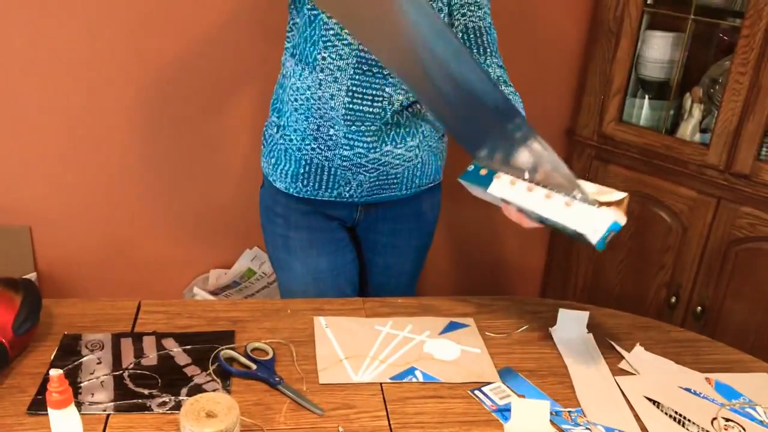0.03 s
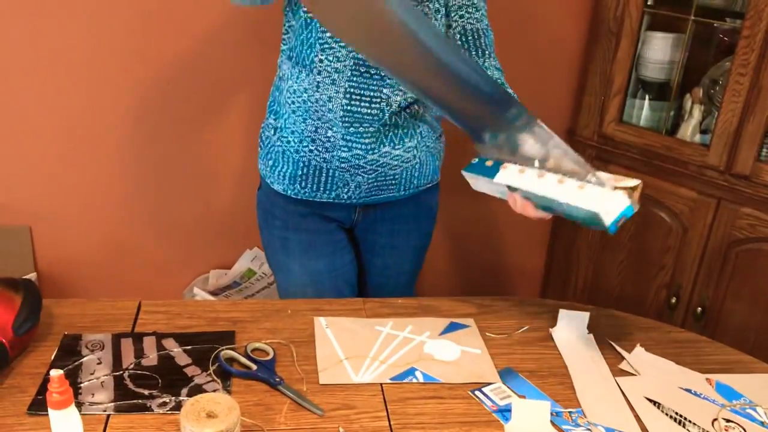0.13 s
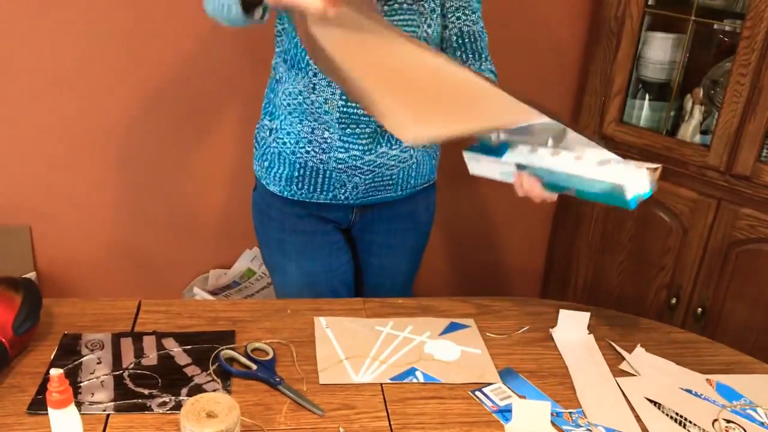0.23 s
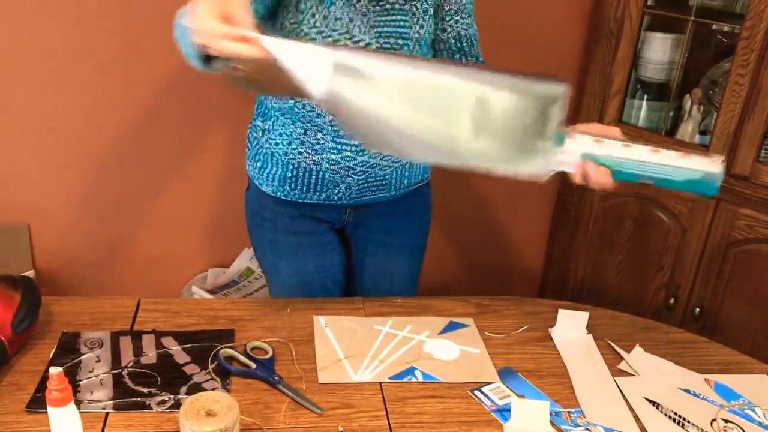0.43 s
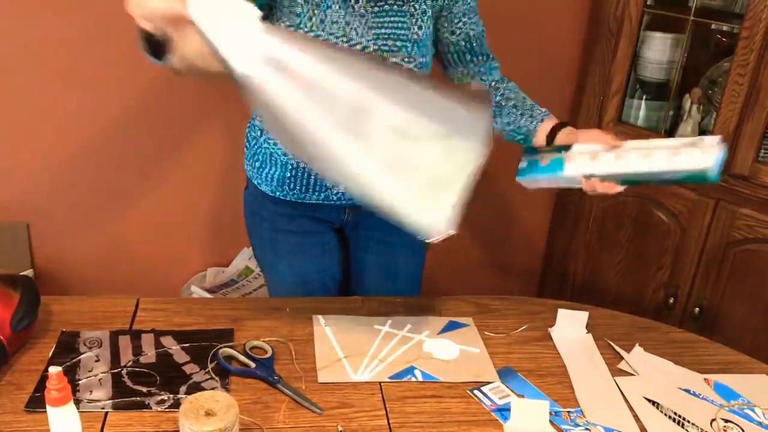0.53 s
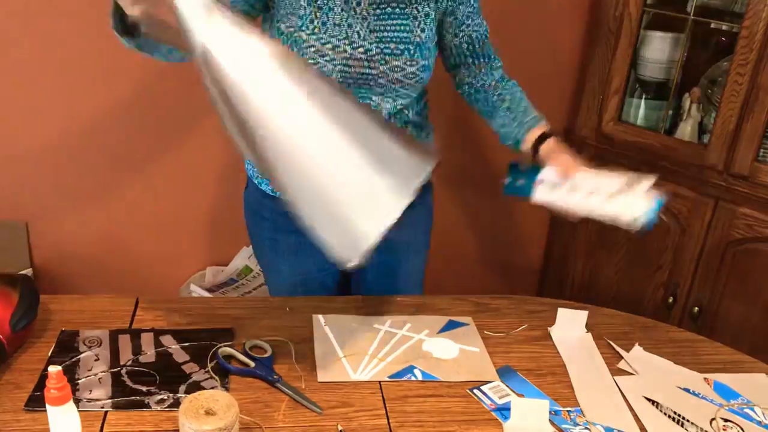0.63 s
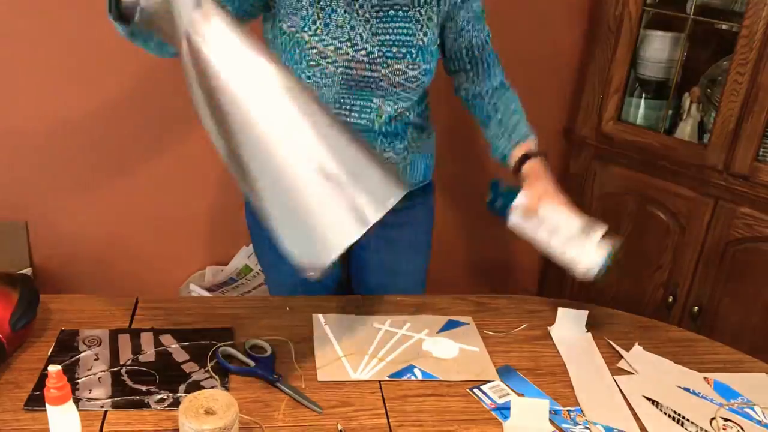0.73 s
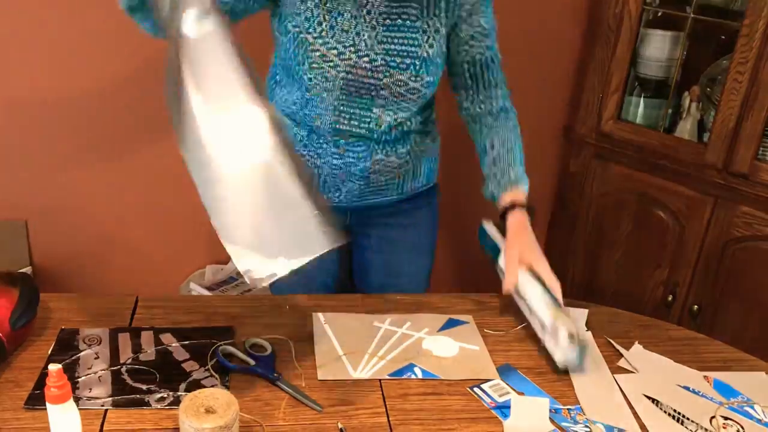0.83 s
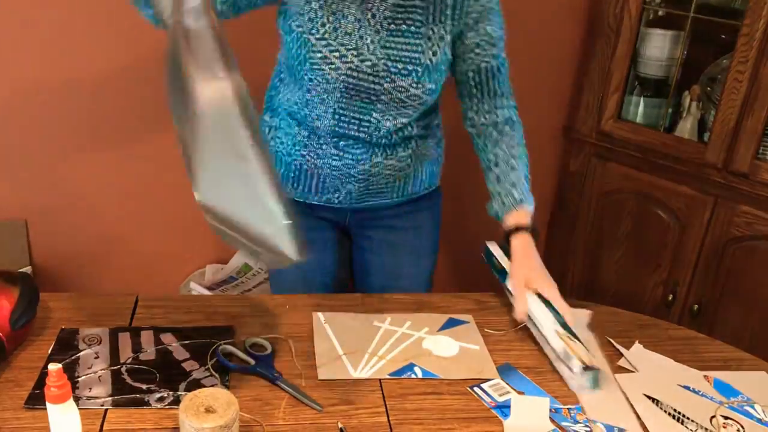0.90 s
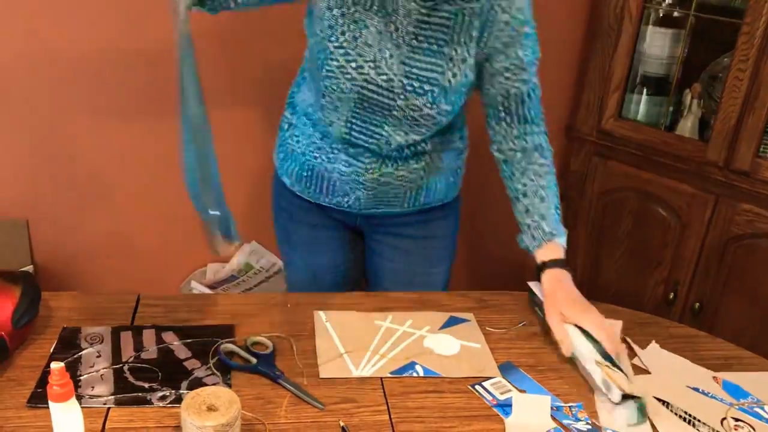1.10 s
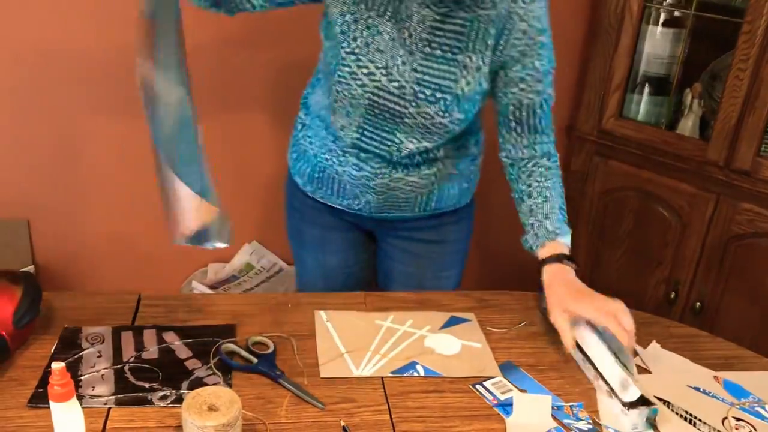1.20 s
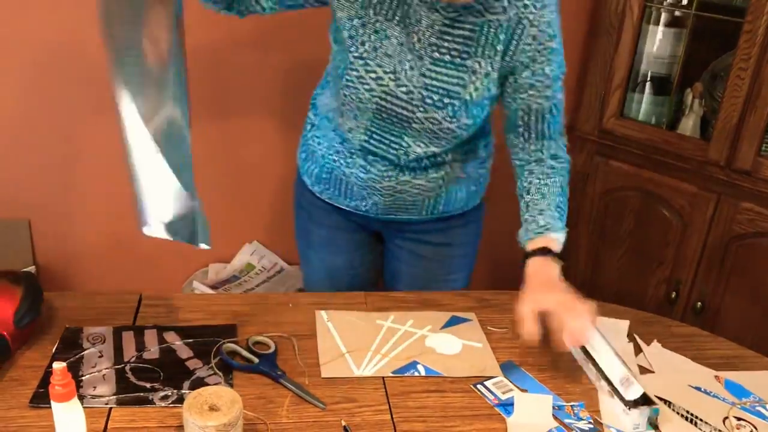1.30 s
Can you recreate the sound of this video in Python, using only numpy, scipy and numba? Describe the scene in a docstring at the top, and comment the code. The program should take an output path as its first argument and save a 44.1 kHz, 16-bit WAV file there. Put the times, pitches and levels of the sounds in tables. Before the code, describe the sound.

A quick, sharp tear of aluminium foil from the roll, followed by softer rustling.

```python
"""A bright rip of aluminium foil, pulled off its roll, torn along the box's toothed edge and swung aside.
The rip is a dense run of tiny fractures; its lowest resonance climbs as the attached strip shortens.
The loose sheet rustles and snaps, and the cardboard box rumbles in the hand.
A small room adds a short tail; faint noise and hum lie underneath."""
import sys
import numpy as np
from scipy import signal
from scipy.fft import rfft, irfft, next_fast_len
from scipy.io import wavfile
from scipy.ndimage import map_coordinates
from numba import njit

SR = 44100
rng = np.random.default_rng(int(sys.argv[2]) if len(sys.argv) > 2 else 0)


def log_audio(samples):
    """Write samples as a 16-bit WAV file to the path given in sys.argv[1]."""
    # one column per channel
    frames = np.atleast_2d(samples).T
    # limit to full scale, then quantise
    limited = np.clip(frames, -1, 1)
    pcm = np.round(limited * 32767).astype(np.int16)
    wavfile.write(sys.argv[1], SR, pcm)


N = 59535

# rip force: t/s, level/dB
RIP_FORCE = [(.2, -46), (.235, -24.5), (.261, -22.5), (.269, -16), (.286, -17.5), (.296, -16),
             (.338, -12.5), (.365, -17.5), (.395, -17), (.428, -19), (.447, -31), (.52, -47)]
# lowest resonance of the attached strip: t/s, f/Hz
STRIP_RESONANCE = [(.23, 500), (.275, 540), (.31, 660), (.345, 807), (.39, 1060), (.44, 1260)]
# fracture spectrum: f/Hz, level/dB
FRACTURE_SPECTRUM = [(150, -26), (500, -3.5), (900, -2), (1300, -1), (1800, -9.5), (2900, -5), (4000, -1.1),
                     (5500, -2.5), (7500, -8), (9500, -6), (10700, -11), (12800, -6), (16000, -14)]
# taut sheet at the cutter: f/Hz, width/Hz, level/dB
CUTTER_MODES = [(1110, 55, -3.5), (1806, 280, 6), (2140, 100, 6), (2436, 250, 3)]
FRACTURES_PER_S, FRACTURE_SCATTER_DB = 9000, 1
SPURTS_PER_S, SPURT_DB = 300, 1.2


def rip():
    """Fractures spurt from tooth to tooth and shake the shrinking strip; the sheet rings most when taut."""
    def taut_sheet(f):
        return sum((-1) ** k * amp(db) * resonance(f, hz, width_hz)
                   for k, (hz, width_hz, db) in enumerate(CUTTER_MODES))

    spurts = amp(SPURT_DB * wobble(SPURTS_PER_S))
    fractures = coloured(spurts * crackle(FRACTURES_PER_S, FRACTURE_SCATTER_DB), FRACTURE_SPECTRUM)
    ring = filtered(spurts * crackle(FRACTURES_PER_S, FRACTURE_SCATTER_DB), taut_sheet)
    sheet = unit(fractures) + amp(-6) * swell(centre_s=.3, sigma_s=.072) * unit(ring)
    corner_hz = curve(STRIP_RESONANCE)
    for _ in range(2):
        sheet = moving_highpass(sheet, corner_hz, damping=1.046)
    return amp(curve(RIP_FORCE, outside=-120)) * unit(sheet)


# last strip coming free: t/s, sigma/s, level/dB, f/Hz, half-width per filter stage/Hz
LAST_STRIP_RINGS = [(0.4085, 0.02, -27, 1280, 52), (0.367, 0.018, -19, 3370, 580)]


def last_strip():
    """The final fractures ring the narrow strip that still holds the sheet."""
    out = np.zeros(N)
    for centre_s, sigma_s, db, hz, half_width_hz in LAST_STRIP_RINGS:
        fractures = crackle(FRACTURES_PER_S, FRACTURE_SCATTER_DB)
        ring = filtered(fractures, lambda f: resonance(f, hz, 2 * half_width_hz) ** 2)
        out += amp(db) * swell(centre_s, sigma_s) * unit(ring)
    return out


# buckling creases: t/s, level/dB, treble tilt/(dB/octave), relative trail level/dB
CREASE_SNAPS = [(.0092, -19, -2, -17.5), (0.0623, -7.5, 11.5, -32), (0.0782, -33, -6, -23),
                (0.1632, -19.5, 27.5, -2.5), (0.22, -39, -7, 1), (0.617, -18, 3, -16),
                (0.7, -32.5, -2.5, -1.5), (0.784, -34, 6, -11), (0.831, -24.5, -3, -15),
                (0.995, -35, -0.5, -0.5), (1.138, -29, 1.5, -10), (1.1567, -31.5, -1, -1),
                (1.21, -35, 0.5, 4), (1.321, -27, -2.5, -6)]
# snap spectrum: f/Hz, level/dB
SNAP_SPECTRUM = [(200, -39), (800, 0), (1500, -8), (2700, 2.5), (6000, 4.5), (10000, 1.5), (12500, 2.5),
                 (16000, -6)]
# sheet modes rung by a snap: f/Hz, level/dB
SHEET_MODES = [(1650, -18), (3600, -15.5), (5400, -17)]
CRACK_T60_S, RING_T60_S, TRAIL_T60_S = .0031, .017, .15
REBOUND_S, REBOUND_DB = .00091, -19


def snaps():
    """Larger creases buckle with a crack, a quick rebound, a brief ring and a trail of crinkles."""
    out = np.zeros(N)
    for start_s, db, tilt_db, trail_db in CREASE_SNAPS:
        t = clock() - start_s
        rebound = amp(REBOUND_DB) * decay(t - REBOUND_S, CRACK_T60_S)
        crack = (decay(t, CRACK_T60_S) + rebound) * rng.choice([-1, 1], N)
        trail = amp(trail_db) * decay(t, TRAIL_T60_S) * crackle(per_s=7000, scatter_db=-3.5)
        modes = sum(amp(mode_db) * np.sin(2 * np.pi * hz * t) for hz, mode_db in SHEET_MODES)
        ring = decay(t, RING_T60_S) * modes
        out += amp(db) * (coloured(crack + trail, SNAP_SPECTRUM, tilt_db) + ring)
    return out


# loose sheet motion: t/s, level/dB
SHEET_MOTION = [(0, -34), (.03, -40.5), (.055, -38.5), (.08, -35.5), (.14, -38.5), (.168, -30.5),
                (.205, -31), (.44, -29), (.52, -33.5), (.65, -36), (.76, -39), (.875, -38.5), (.925, -36),
                (.97, -38), (1.035, -35), (1.125, -39.5), (1.19, -38), (1.225, -34), (1.3, -37.5),
                (1.35, -37.5)]
# wrinkle spectrum: f/Hz, level/dB
WRINKLE_SPECTRUM = [(120, -34), (500, -21.5), (700, -13.5), (1000, -7), (1300, -4), (2000, -3.5),
                    (2800, -1.5), (5200, -2), (6500, -5.5), (9300, -7.5), (10600, -16.5), (13000, -13),
                    (16000, -25)]
TREBLE_HZ, TREBLE_DB_PER_DB = 7650, 1.07


def rustle():
    """Small wrinkles flip as the sheet moves; faster motion is louder and brighter."""
    motion_db = curve(SHEET_MOTION)
    wrinkles = unit(coloured(crackle(per_s=7000, scatter_db=3), WRINKLE_SPECTRUM))
    treble = filtered(wrinkles, lambda f: 1 - 1 / (1 + (f / TREBLE_HZ) ** 4))
    treble_gain = amp(TREBLE_DB_PER_DB * (motion_db - motion_db.mean()))
    return amp(motion_db) * (wrinkles - treble + treble_gain * treble)


# shoves of the box: t/s, level/dB, sigma/s, f/Hz, relative scuff level/dB
BOX_SHOVES = [(0.031, -50, 0.029, 315, -11), (0.057, -52, 0.042, 598, -16), (0.259, -44, 0.018, 160, 1),
              (0.273, -37, 0.011, 436, -9), (0.289, -40, 0.01, 245, -1), (0.346, -47, 0.081, 340, -6),
              (0.343, -41, 0.0045, 130, -21), (0.396, -42.5, 0.029, 205, -13),
              (0.675, -54, 0.016, 252, -14), (0.951, -55.5, 0.013, 271, 8.5),
              (1.064, -46.5, 0.033, 369, -4), (1.206, -51.5, 0.014, 420, 3), (1.259, -44, 0.011, 150, 1),
              (1.277, -55, 0.043, 357, 5)]
# cardboard scuffing under the fingers: f/Hz, level/dB
SCUFF_SPECTRUM = [(25, -9), (55, 0), (100, 6.5), (380, 10.5), (550, 5), (900, 6.5), (1700, -28),
                  (4000, -14.5)]
WAVERS_PER_S, WAVER_FRACTION, FLUTTER_DB = 110, .038, 5


def box():
    """Each shove makes the cardboard scuff and ring with a hollow, unsteady note."""
    out = np.zeros(N)
    for centre_s, db, sigma_s, hz, scuff_db in BOX_SHOVES:
        pitch_hz = hz * (1 + WAVER_FRACTION * wobble(WAVERS_PER_S))
        note = np.sin(2 * np.pi * np.cumsum(pitch_hz) / SR)
        boom = unit(note * amp(FLUTTER_DB * wobble(WAVERS_PER_S)))
        scuff = coloured(rng.standard_normal(N), SCUFF_SPECTRUM)
        out += amp(db) * swell(centre_s, sigma_s) * (boom + amp(scuff_db) * scuff)
    return out


# room decay: f/Hz, T60/s
ROOM_DECAY = [(150, 0.56), (1000, 0.27), (5000, 0.15), (15000, 0.28)]
ROOM_DELAY_S, ROOM_RENEW_S = .003, .04


def room(x):
    """The walls answer with a short, diffuse tail, redrawn at a fixed rate so it rings with no pitch."""
    hop = round(ROOM_RENEW_S * SR)
    wet = np.zeros(N + 2 * SR)
    padded = np.pad(x, (hop, 2 * hop))
    fade = np.sin(np.pi * np.arange(2 * hop) / (2 * hop))
    for start in range(0, N + hop, hop):
        hz, t, noise = signal.stft(rng.standard_normal(SR // 2), SR, nperseg=256)
        t60_s = along(ROOM_DECAY, hz)[:, None]
        _, tail = signal.istft(noise * decay(t, t60_s), SR, nperseg=256)
        echo = signal.fftconvolve(padded[start:start + 2 * hop] * fade, tail / np.linalg.norm(tail))
        wet[start:start + len(echo)] += echo
    return filtered(wet[hop:hop + N], lambda f: np.exp(-2j * np.pi * f * ROOM_DELAY_S))


# hum tones: f/Hz, level/dB
HUM_TONES = [(54, -70), (58.2, -66.5)]
# room noise: f/Hz, level/dB
NOISE_SPECTRUM = [(20, -23), (50, -1.5), (90, -8), (200, -6), (370, -3.5), (520, -18), (2000, -6.5),
                  (16000, -44)]
NOISE_DB = -52.5


def background():
    """Two low tones beat under quiet room noise."""
    hum = sum(amp(db) * unit(np.sin(2 * np.pi * (hz * clock() + rng.random()))) for hz, db in HUM_TONES)
    return hum + amp(NOISE_DB) * coloured(rng.standard_normal(N), NOISE_SPECTRUM)


def amp(db):
    """Decibels to gain."""
    return 10 ** (np.asarray(db) / 20)


def unit(x):
    """Scale to rms 1."""
    return x / np.sqrt(np.mean(x ** 2) + 1e-20)


def clock():
    """Sample times in s."""
    return np.arange(N) / SR


def curve(rows, outside=None):
    """Interpolate (t/s, value) rows at each sample."""
    return np.interp(clock(), *np.transpose(rows), left=outside, right=outside)


def along(rows, hz):
    """Interpolate (f/Hz, value) rows on a log axis."""
    f, values = np.transpose(rows)
    return np.interp(np.log(hz + 1), np.log(f + 1), values)


def swell(centre_s, sigma_s):
    """Gaussian envelope, peak 1."""
    return np.exp(-.5 * ((clock() - centre_s) / sigma_s) ** 2)


def decay(t, t60_s):
    """Exponential decay from t = 0."""
    return (t >= 0) * amp(-60 * np.abs(t) / t60_s)


def wobble(knots_per_s):
    """Smooth random curve."""
    return map_coordinates(rng.standard_normal(4000), [clock() * knots_per_s], mode="wrap")


def crackle(per_s, scatter_db):
    """Clicks of random time, sign and size, rms 1."""
    hits = rng.random(N) < per_s / SR
    signs = rng.choice([-1, 1], N)
    sizes = amp(scatter_db * np.clip(rng.standard_normal(N), -2, 2))
    return unit(hits * signs * sizes)


def resonance(f, hz, width_hz):
    """Complex band-pass response of one mode."""
    return 1j * f * width_hz / (hz * hz - f * f + 1j * f * width_hz)


def filtered(x, response):
    """Apply a complex frequency response."""
    size = next_fast_len(N + SR // 2, True)
    return irfft(rfft(x, size) * response(np.fft.rfftfreq(size, 1 / SR)), size)[:N]


def coloured(x, spectrum, tilt_db=0):
    """Unit-energy minimum-phase filter from (f/Hz, level/dB) rows; tilt per octave above 2 kHz."""
    size = 4096
    hz = np.fft.rfftfreq(size, 1 / SR)
    gain_db = along(spectrum, hz) + tilt_db * np.log2(np.maximum(hz, 2000))
    cepstrum = irfft(gain_db * np.log(10) / 20)
    cepstrum[1:size // 2] *= 2
    cepstrum[size // 2 + 1:] = 0
    kernel = irfft(np.exp(rfft(cepstrum)))
    return signal.fftconvolve(x, kernel / np.linalg.norm(kernel))[:N]


@njit
def moving_highpass(x, corner_hz, damping):
    """Resonant state-variable high-pass with a moving corner."""
    step = 2 * np.pi * corner_hz / SR
    high, low, band = np.zeros(len(x)), 0., 0.
    for i in range(len(x)):
        low += step[i] * band
        high[i] = x[i] - low - damping * band
        band += step[i] * high[i]
    return high


def scene(room_db=-7.5, snap_send_db=-16):
    """Foil and box in the room; the snaps face the listener and sound drier."""
    diffuse = rip() + last_strip() + rustle() + box()
    cracks = snaps()
    wet_gain = amp(room_db)
    walls = wet_gain * room(diffuse + amp(snap_send_db) * cracks)
    mix = (diffuse + cracks + walls) / np.hypot(1, wet_gain)
    return (mix + background())[None]


def record(dry, ceiling=.88, cutoff_hz=15800):
    """Soft peak limit, then a steep low-pass."""
    limited = dry[0] / (1 + np.abs(dry[0] / ceiling) ** 6) ** (1 / 6)
    return filtered(limited, lambda f: 1 / np.sqrt(1 + (f / cutoff_hz) ** 500))[None]


dry = scene()
out = record(dry)
log_audio(out)
```